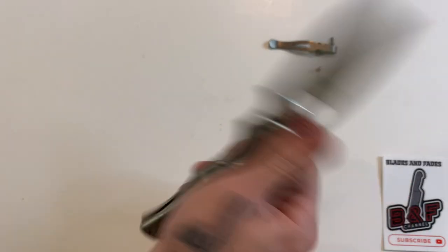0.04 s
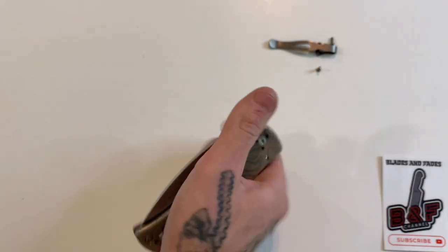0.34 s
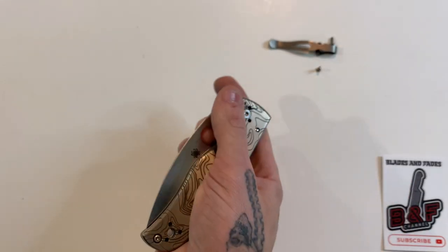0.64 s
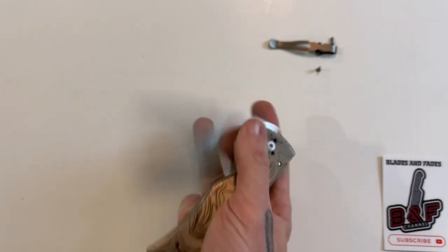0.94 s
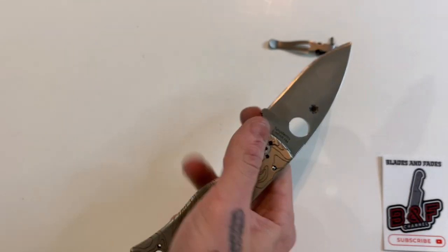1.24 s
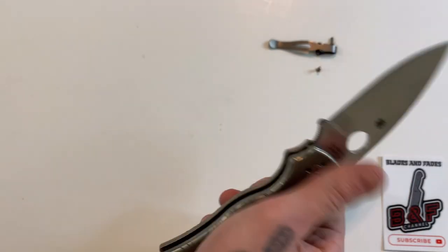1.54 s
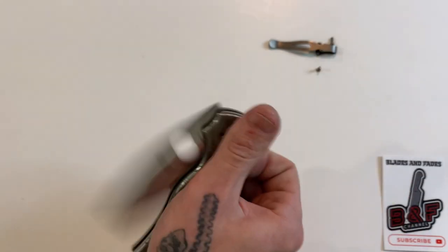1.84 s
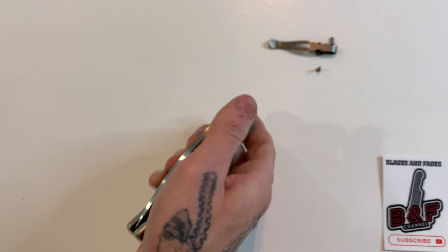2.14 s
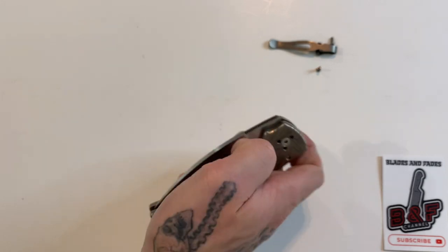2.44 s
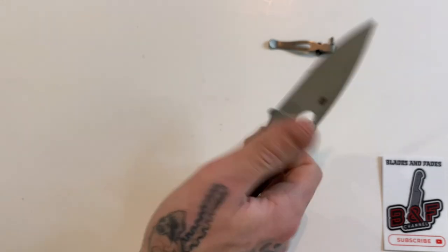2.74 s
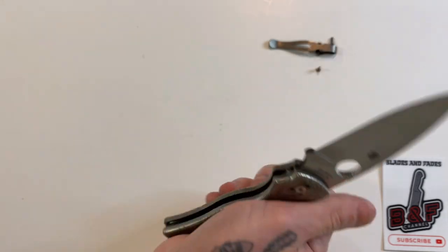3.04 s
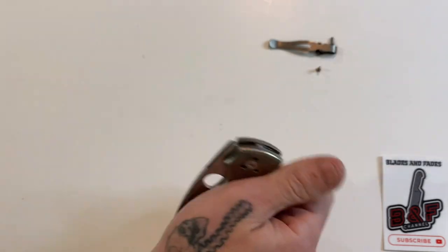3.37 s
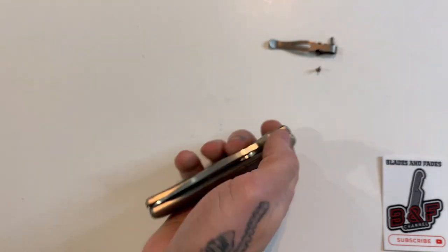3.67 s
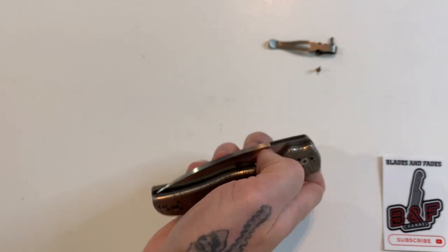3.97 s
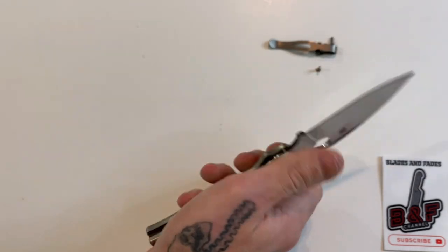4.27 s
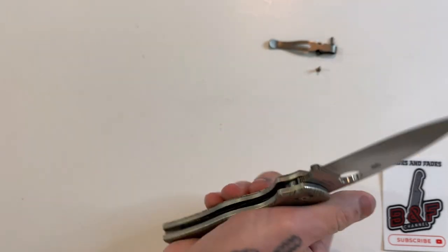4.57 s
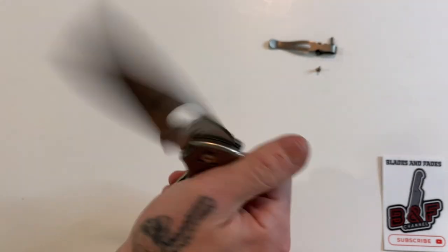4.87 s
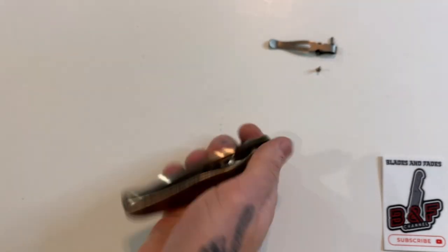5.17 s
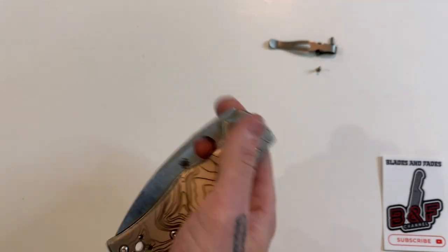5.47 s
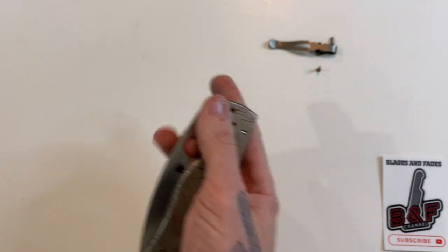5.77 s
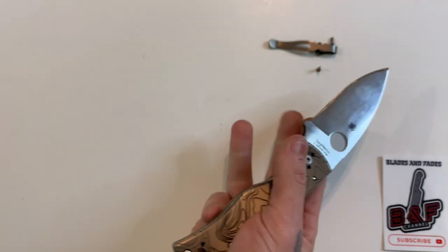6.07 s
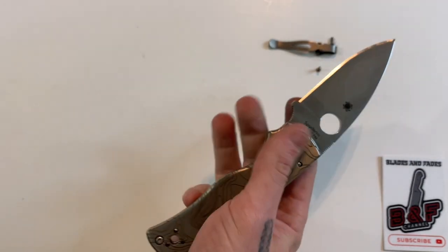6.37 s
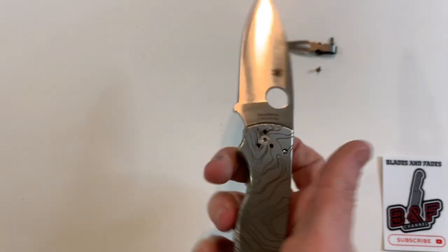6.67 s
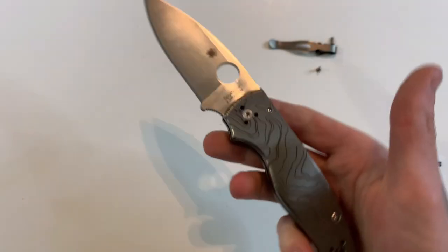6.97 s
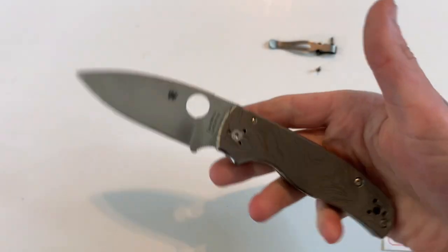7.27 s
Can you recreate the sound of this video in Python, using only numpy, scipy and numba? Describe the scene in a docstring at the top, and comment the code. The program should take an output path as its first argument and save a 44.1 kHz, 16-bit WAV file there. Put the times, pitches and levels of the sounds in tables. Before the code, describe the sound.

Sharp metallic snaps come about once a second as a hand closes and opens a pocket knife, four times each way, starting with a close and ending with an open. The lock clicks free, the blade slaps shut, then flicks out and locks with a short, damped ring. Fingers lightly tap and rub the handle, mostly at the end. The microphone is close, in a small room with a low, steady fan.

```python
"""A folding knife is swung shut and flicked open four times, close to a phone in a small room.
Opening, the blade hits its stop and the lock snaps in; closing, the lock clicks free and the blade
slaps the handle and bounces. Each hit is a short rattle plus ringing tones that the grip soon damps.
Fingers tap and rub the handle, it bumps the palm, and a fan hums behind.
The phone turns its volume down at each loud snap."""
import sys
import numpy as np
from scipy import signal
from scipy.fft import rfft, irfft
from scipy.io import wavfile
from scipy.ndimage import uniform_filter1d
from numba import njit

SR = 44100
rng = np.random.default_rng(int(sys.argv[2]) if len(sys.argv) > 2 else 0)


def dump(signal):
    """Clip the signal to [-1, 1] and save it as 16-bit WAV at the path in sys.argv[1]."""
    limited = np.clip(np.atleast_2d(signal).T, -1, 1)
    pcm = np.round(limited * 32767).astype(np.int16)
    wavfile.write(sys.argv[1], SR, pcm)


N = 322360
LOCK_LAG_S = .0051  # from the blade hitting its stop to the lock snapping in

# Tones of the soft knock as the blade breaks free: pitch_hz, level_db, ring_s (time to fade by 60 dB)
KNOCK_TONES = [(2200, 1.5, .05), (2350, 1.5, .06), (4030, -3.5, .06)]
# Tones of the open knife: pitch_hz, level_db, ring_s
OPEN_TONES = [(2310, -5.5, .08), (3702, -14, .12), (4200, 2.5, 0.18), (4450, -8.5, 0.35), (4650, -5, 0.089),
              (6070, 0, 0.52), (6540, 2.5, 0.35), (6550, 0.5, 0.39), (8800, -5.5, 0.3), (8650, -6, .3),
              (9060, -7, .15), (12000, -7.5, .15), (12900, 7, 0.06)]
# How strong the opening rattle and hiss are from low to high: pitch_hz, level_db
OPEN_RATTLE = [(200, -49.5), (600, -30), (1000, -15), (1550, -6.5), (2300, -8), (3500, -5.5), (4100, -1.5),
               (5500, 1), (8500, 1), (11500, -2.5), (14000, 1.5), (15500, 0), (16500, -18)]
# Flicks, timed at the blade's stop. More tilt is brighter; the free tone rings on afterwards:
# hit_s, release_db, ball_db, stop_db, lock_db, tilt_db_per_octave, free_tone_hz, free_tone_db
FLICKS = [(0.963, -44, -32.5, -12.5, 5, 1, 4170, -40), (2.5714, -40, -57, 3, -2.5, 0.5, 6260, -40),
          (4.0685, -41, -46, 1, 1, -1.15, 6330, -37), (6.027, -46, -31, -1, 3, 0.4, 4120, -44.5)]

def flick_open(swing_s=.046, ball_lead_s=.0272, seat_lag_s=.008):
    """The blade breaks free with a soft knock, swings out and hits its stop; the lock snaps in."""
    soft, hard = [], []
    for s, release_db, ball_db, stop_db, lock_db, tilt, *_ in FLICKS:
        soft += [(s - swing_s, release_db, -3.5),
                 (s - ball_lead_s, ball_db, -2)]  # the ball that held the blade shut rides onto it
        hard += [(s, stop_db, tilt + 3.5),
                 (s + LOCK_LAG_S, lock_db, tilt + 1),
                 (s + seat_lag_s, lock_db - 10.5, tilt - 3.5)]  # the lock settles into its seat
    knocks = hits(soft, SKIN_NOISE, KNOCK_TONES, gain_db=-10, body_db=-5.5, grip_s=.042, ring_db=-43.5,
                  rise_s=.00071, rattle_s=.02)
    hiss = lead_in_hiss(FLICKS, OPEN_RATTLE, level_db=-44.5, lead_s=swing_s, growth_db=16.5)
    snaps = hits(hard, OPEN_RATTLE, OPEN_TONES, gain_db=3, body_db=-17, grip_s=.029, ring_db=-43.5)
    return knocks + hiss + blade_ring() + snaps

def blade_ring(ring_s=.24):
    """Each grip leaves one tone of the open blade free to ring on after the lock snaps."""
    out, t = np.zeros(N), np.arange(int(ring_s * SR)) / SR
    for s, *_, hz, db in FLICKS:
        add(out, s + LOCK_LAG_S, undb(db) * fade(t, ring_s) * np.sin(2 * np.pi * hz * t))
    return out

# Tones of the lock: pitch_hz, level_db, ring_s
LOCK_TONES = [(4120, -17, 0.17), (6000, -2, .15), (6400, -4, .15), (9810, -5.5, .1), (10400, -10.5, 0.081),
              (13400, 1, .08), (15800, 0.5, .08)]
# The lock's rattle from low to high: pitch_hz, level_db
LOCK_RATTLE = [(300, -24), (2000, -23), (3400, -29), (4800, -5.5), (5900, 6), (7400, -12), (8700, -3.5),
               (11000, -6.5), (13000, -9), (15000, -6.5), (16500, -8.5)]
# The lock bar being pressed or clicking free: start_s, level_db
LOCK_CLICKS = [(0.0328, -44), (0.084, -32.5), (1.7648, -13.5), (3.196, -43), (3.2515, -26), (4.794, -40),
               (4.869, -16)]

def unlock(firm_db=-12):
    """The lock bar is pressed and clicks free; a light press sounds duller than a firm click."""
    clicks = [(s, db, 3 + .1 * (db - firm_db)) for s, db in LOCK_CLICKS]
    return hits(clicks, LOCK_RATTLE, LOCK_TONES, gain_db=-2.5, body_db=-9, grip_s=.0041, ring_db=-58.5,
                rise_s=.00029, rattle_s=.0039)

# Tones of the shut knife: pitch_hz, level_db, ring_s
SHUT_TONES = [(2055, -3, .05), (2148, -4.5, .06), (4500, 1.5, 0.45), (4680, 4, 0.2), (4800, -1.5, .2),
              (6660, 1.5, 0.12), (6420, -3.5, .12), (8170, -3, .18), (10600, -5, 0.13), (10540, 3.5, .1),
              (10200, -0.5, .08), (14400, -7, .06)]
# The closing rattle and hiss from low to high: pitch_hz, level_db
SHUT_RATTLE = [(200, -37.5), (600, -20.5), (1100, -10), (1600, -12), (2100, -3.5), (2800, -20.5),
               (3500, -12.5), (4600, 0.5), (5500, 0.5), (6800, 5), (11500, -1.5), (15000, -7), (16300, -26)]
# The blade slapping the handle: hit_s, slap_db, bounce_after_s, bounce_db, tilt_db_per_octave
SLAPS = [(0.1567, 1.5, 0.023, 0.5, 2), (1.8679, 2, 0.014, -4.5, 2), (3.3558, 2, .0094, -0.5, 2.5),
         (4.9598, 2.5, 0.014, 1, 0.05)]

def swing_shut():
    """The blade swings in, slaps the handle and bounces once, a little duller."""
    slaps = []
    for s, slap_db, bounce_after_s, bounce_db, tilt in SLAPS:
        slaps += [(s, slap_db, tilt), (s + bounce_after_s, bounce_db, tilt - .5)]
    hiss = lead_in_hiss(SLAPS, SHUT_RATTLE, level_db=-35.5, lead_s=.0075, growth_db=21)
    return hiss + hits(slaps, SHUT_RATTLE, SHUT_TONES, gain_db=-4.5, body_db=-12.5, grip_s=.027,
                       ring_db=-47.5, rattle_s=.014)

def hits(events, curve, tones, gain_db, body_db, grip_s, ring_db, rise_s=.0005, rattle_s=.0095):
    """Each (hit_s, level_db, tilt) rattles briefly and starts tones; the grip damps all but a trace."""
    out, t = np.zeros(N), np.arange(SR // 2) / SR
    hz, tone_db, ring_s = np.array(tones, float).T[:, :, None]
    damped = undb(body_db) * fade(t, grip_s * np.sqrt(hz.mean() / hz))  # fingers stop high tones first
    faint_ring = undb(ring_db) * fade(t, np.minimum(ring_s, .28))
    swell = 1 - np.exp(-(t / rise_s) ** 2)
    for s, db, tilt in events:
        rattle = colour(burst(swell * fade(t, 2 * rattle_s)), curve, tilt)
        rattle /= np.sqrt(np.sum(rattle ** 2) / (.002 * SR))  # as much energy as 2 ms at level 1
        # every hit lands a little differently, and the grip shifts the pitches
        size, detune, phase = rng.standard_normal((3, len(tones), 1))
        strength = undb(tone_db + 2 * size + tilt * np.log2(hz / hz.mean()))
        waves = np.sin(2 * np.pi * (hz * (1 + .0047 * detune) * t + phase))
        ring = (strength * (damped + faint_ring) * waves).sum(0)
        add(out, s - rise_s, undb(db + gain_db) * (rattle + swell * ring))
    return out

def lead_in_hiss(events, curve, level_db, lead_s, growth_db):
    """A brief gritty hiss swells just before each hit."""
    swell, ramp = np.zeros(N), np.linspace(-1, 0, int(lead_s * SR))
    for s, *_ in events:
        add(swell, s - lead_s, undb(level_db + growth_db * ramp))
    grit = undb(2 * wander(370))
    return swell * grit * unit(colour(rng.standard_normal(N), curve, tilt=-3))

# Fingertips and nails on the knife: start_s, level_db
FINGER_TAPS = [(1.4527, -45.5), (1.5004, -50.5), (2.9223, -48.5), (4.5047, -55), (6.9522, -59),
               (7.0628, -51.5), (7.1906, -47), (7.2474, -39)]

def finger_taps(tick_count=14):
    """Fingers tap the knife lightly, and the shifting grip makes faint ticks at random times."""
    ticks = [(when * N / SR, -63 + 9 * size) for when, size in rng.random((tick_count, 2))]
    taps = [(s, db, 3) for s, db in list(FINGER_TAPS) + ticks]
    return hits(taps, SKIN_NOISE, SHUT_TONES, gain_db=-7, body_db=-15.5, grip_s=.015, ring_db=-53,
                rise_s=.001, rattle_s=.02)

# The noise of skin on the knife, from low to high: pitch_hz, level_db
SKIN_NOISE = [(300, -20), (1000, -1), (2300, -2), (3500, 1), (6000, 5), (8000, -5), (10500, -6.5),
              (13000, -25), (16000, -28.5)]
# Strokes along the handle: firmest_s, level_db, swell_s, fade_s
RUBS = [(1.51, -71.5, .08, .25), (3.03, -75.5, .15, 0.18), (6.73, -50, .19, 0.15),
        (7.181, -63.5, 0.33, 0.082), (7.248, -50.5, 0.016, 0.036), (7.305, -49.5, 0.061, .06)]

def finger_rubs(depth_db=23.5, roundness=1.04):
    """Skin slips over the textured handle in countless tiny steps; each stroke swells and dies away."""
    t, pressure = np.arange(N) / SR, np.zeros(N)
    for s, db, swell_s, fade_s in RUBS:
        from_peak = np.maximum((s - t) / swell_s, (t - s) / fade_s)
        pressure += undb(db - depth_db * from_peak ** roundness)
    slips = rng.standard_normal(N) * undb(2 * wander(710))
    return pressure * unit(colour(slips, SKIN_NOISE))

# The handle landing in the palm: start_s, level_db
PALM_BUMPS = [(5.122, -46), (5.157, -48), (6.956, -39.5)]

def palm_bumps(palm_hz=95, rise_s=.0055, ring_s=.1):
    """The handle drops into the palm with a dull thud: one low tone plus soft noise."""
    out, t = np.zeros(N), np.arange(SR // 4) / SR
    flesh_curve = [(50, -4.5), (130, 1.5), (300, -11.5), (900, -22), (3000, -56)]
    envelope = 2 * (1 - np.exp(-t / rise_s)) * fade(t, ring_s)
    for s, db in PALM_BUMPS:
        flesh = undb(-5) * unit(colour(rng.standard_normal(len(t)), flesh_curve))
        add(out, s, undb(db) * envelope * (np.sin(2 * np.pi * palm_hz * t) + flesh))
    return out

def microphones(x, split_hz=6800, right_lead_samples=13, left_lead_samples=3):
    """The right microphone hears the highs first; the phone steers lower sounds slightly left."""
    t, hz = np.arange(SR // 100) / SR, np.fft.rfftfreq(N, 1 / SR)
    # hand and phone scatter the sound differently to each side, shifting the timing of each pitch
    paths = undb(-10) * np.array([burst(fade(t, .012)) for _ in range(2)])
    paths[:, 0] = 1
    left, right = rfft(x) * np.exp(1j * np.angle(rfft(paths, N)))
    highs = (1 + np.tanh((hz - split_hz) / 600)) / 2
    lag = highs * right_lead_samples - (1 - highs) * left_lead_samples
    left = irfft(left * np.exp(-2j * np.pi * hz * lag / SR), N)
    left = colour(left, [(700, -7), (1800, 0), (3000, 1.5), (5500, -2.5), (9000, 0)])
    return np.array([left, irfft(right, N)])

# The room's echo from low to high: pitch_hz, level_db, ring_s
ROOM_ECHO = [(302, 4, .4), (1000, 1, 0.18), (2000, -3, 0.35), (4000, -5.5, 0.41), (7000, -6.5, 0.38),
             (10000, -4, 0.31), (12000, -11, .18), (13800, -9.5, .26), (15000, -23, .12), (16500, -27, .1)]

def room(x, tail_db=-13, build_s=.0018, wall_db=-16, wall_s=.0085, wall_fade_s=.0074):
    """A near wall sends back a quick echo, amid a wash of echoes whose highest pitches fade first."""
    t = np.arange(int(.8 * SR)) / SR
    hz = np.fft.rfftfreq(len(t), 1 / SR)
    noise = rfft(rng.standard_normal((2, len(t))))
    tail = 0
    for share, (_, db, ring_s) in zip(np.eye(len(ROOM_ECHO)), ROOM_ECHO):
        band = np.interp(hz, np.array(ROOM_ECHO)[:, 0], share)
        tail = tail + undb(db) * irfft(noise * band, len(t)) * fade(t, ring_s)
    tail *= 1 - np.exp(-(t / build_s) ** 2)
    wall_envelope = (t > wall_s) * fade(abs(t - wall_s), wall_fade_s)
    wall = colour(rng.standard_normal((2, len(t))) * wall_envelope, ROOM_ECHO)
    echoes = (undb(tail_db) * unit(tail) + undb(wall_db) * unit(wall)) / np.sqrt(len(t))
    return signal.fftconvolve(x[None], echoes, axes=1)[:, :N]

# The fan's rush of air from low to high: pitch_hz, level_db
FAN_AIR = [(15, -55), (25, -29), (36, -16), (53, 1.5), (87, -11.5), (141, -8.5), (373, -14.5), (405, -21.5),
           (439, -18.5), (1370, -35.5), (1650, -34), (2500, -47.5), (3450, -45.5), (4030, -46),
           (4610, -40.5), (5300, -45), (7000, -45.5), (8300, -49), (14000, -53.5), (16000, -74)]
# Hum of the motor and its power supply: pitch_hz, level_db
FAN_HUM = [(59.8, -62), (140, -75), (192, -69.5), (237, -71.5), (299, -72.5), (329, -79), (373.5, -70),
           (4549, -89.5)]

def fan(air_db=-57.5, waver_db=2, pan_db=-2):
    """Air rushes steadily under wavering motor tones; the bass is alike on both sides."""
    t, sides = np.arange(N) / SR, np.array([[1], [-1]])
    middle, width = (unit(colour(rng.standard_normal(N), FAN_AIR)) for _ in range(2))
    width = colour(width, [(60, -11), (170, -14.5), (350, -1.5), (700, 2), (8000, -.5)])
    hum = 0
    for hz, db in FAN_HUM:
        strength = np.sqrt(2) * undb(db + waver_db * wander(4.6))
        hum += strength * np.sin(2 * np.pi * hz * t + wander(6))
    return undb(air_db) * (middle + sides * width) + hum * undb(sides * pan_db)

def undb(db):
    """Turn decibels into a multiplier."""
    return 10 ** (np.asarray(db) / 20)

def unit(x):
    """Scale a sound to an average (rms) level of 1."""
    return x / np.sqrt(np.mean(x ** 2))

def fade(t, ring_s):
    """Die away by 60 dB every ring_s seconds."""
    return np.exp(-np.log(1000) * t / ring_s)

def colour(x, curve, tilt=0):
    """Filter a sound by a (pitch_hz, level_db) curve; tilt brightens it, in dB per octave."""
    n, curve = x.shape[-1], np.array(curve, float)
    hz = np.fft.rfftfreq(n, 1 / SR)
    db = np.interp(np.log(hz + 1), np.log(curve[:, 0]), curve[:, 1])
    db += tilt * np.log2(np.maximum(hz / 6000, .1))
    # fold the filter forward in time so that nothing sounds before its hit
    folded = irfft(np.log(undb(db)), n)
    folded[1:n // 2] *= 2
    folded[n // 2 + 1:] = 0
    return irfft(rfft(x) * np.exp(rfft(folded)), n)

def add(track, s, sound):
    """Mix a sound in at s seconds."""
    i = max(int(s * SR), 0)
    track[..., i:i + sound.shape[-1]] += sound[..., :max(N - i, 0)]

def wander(rate_hz):
    """A random drift of about 1 either way, turning rate_hz times a second."""
    step = int(SR / rate_hz)
    steps = np.repeat(rng.standard_normal(N // step + 1), step)
    return unit(uniform_filter1d(steps, step)[:N])

def burst(envelope, passes=3):
    """A puff of noise that follows the envelope and holds every pitch about equally."""
    x = rng.standard_normal(len(envelope)) * envelope
    for _ in range(passes):
        evened = irfft(np.exp(1j * np.angle(rfft(x))), len(x))
        x = evened * envelope ** (1 / passes)
    return x / np.linalg.norm(x)

def scene(hand_shade_db=-2):
    """Knife and hand over the fan; the hand shades the closing knife from the room."""
    opening = flick_open() + finger_taps() + finger_rubs()
    closing = unlock() + swing_shut()
    direct = microphones(opening + closing)
    return direct + room(opening + undb(hand_shade_db) * closing) + palm_bumps() + fan()

@njit
def hold_peaks(loudness, keep):
    """Jump up to each peak at once, then sink slowly."""
    out, held = np.empty(len(loudness)), 0.
    for i in range(len(loudness)):
        held = max(loudness[i], held * keep)
        out[i] = held
    return out

def record(dry, threshold_db=-17, squeeze=.61, recover_s=.083, top_hz=16200):
    """The phone turns down at each snap and recovers, rounds off peaks and cuts the very top."""
    power = uniform_filter1d(np.mean(dry ** 2, axis=0), SR // 500)
    held = hold_peaks(np.sqrt(np.abs(power)), np.exp(-1 / (recover_s * SR)))
    gain = np.maximum(held / undb(threshold_db), 1) ** -squeeze
    rounded = 1.247 * np.tanh(dry * gain / 1.264)
    return signal.sosfilt(signal.ellip(8, .2, 70, top_hz, fs=SR, output="sos"), rounded)

dry = scene()
out = record(dry)
dump(out)
```